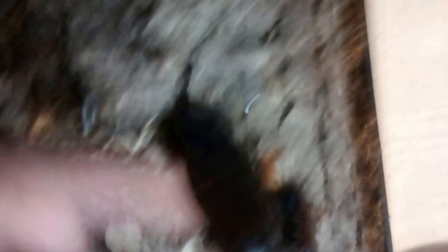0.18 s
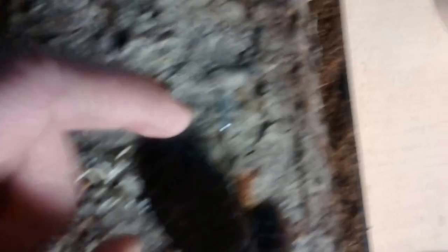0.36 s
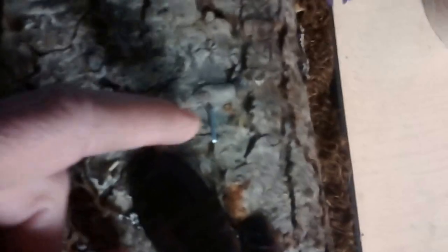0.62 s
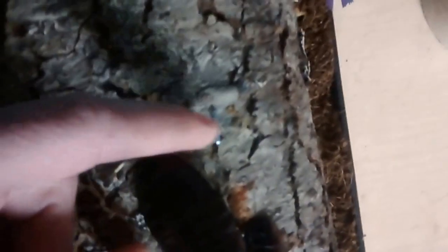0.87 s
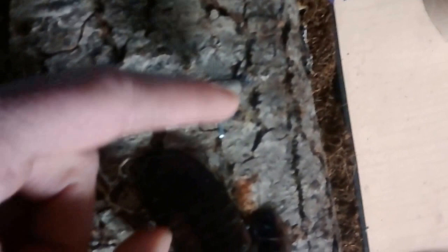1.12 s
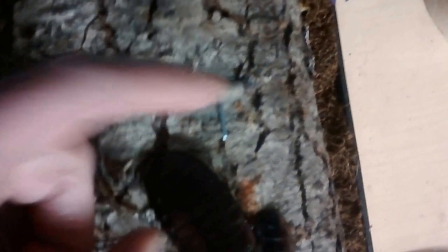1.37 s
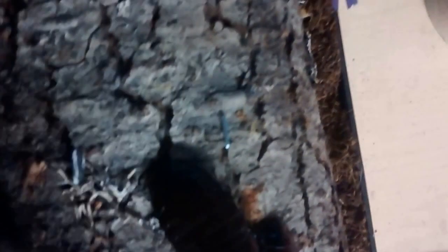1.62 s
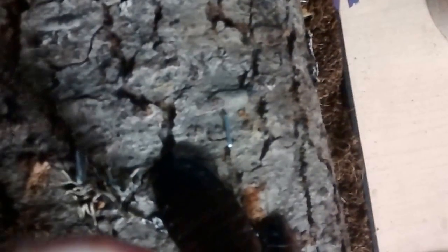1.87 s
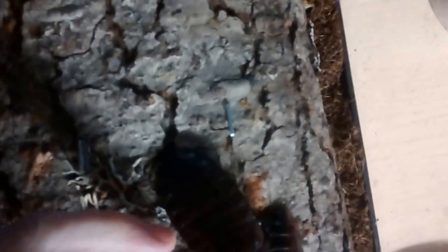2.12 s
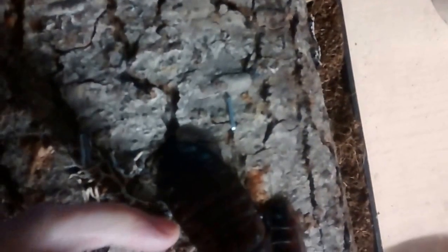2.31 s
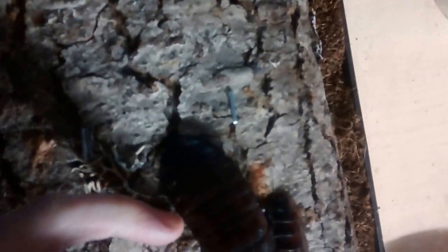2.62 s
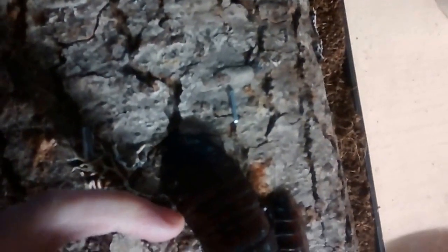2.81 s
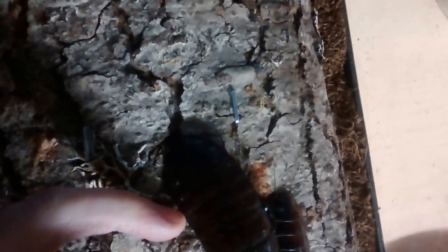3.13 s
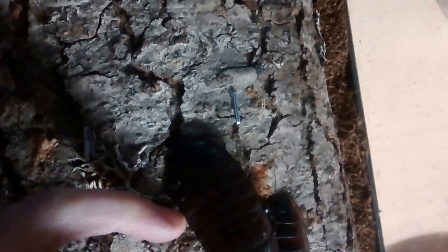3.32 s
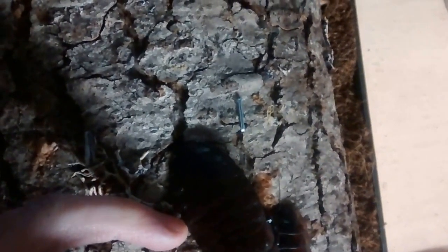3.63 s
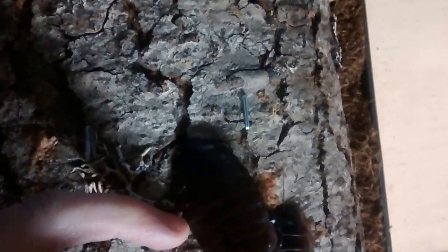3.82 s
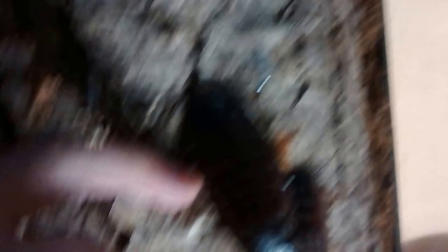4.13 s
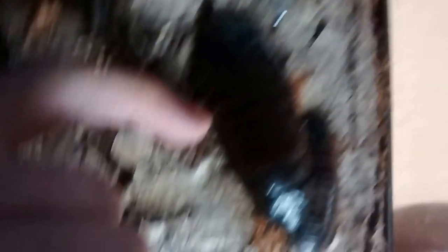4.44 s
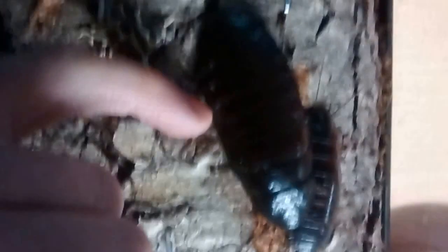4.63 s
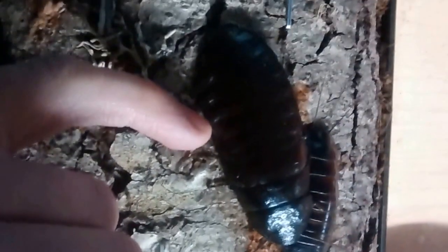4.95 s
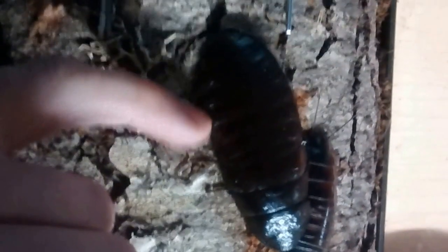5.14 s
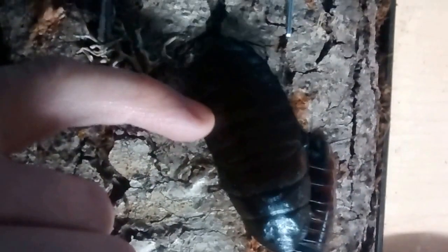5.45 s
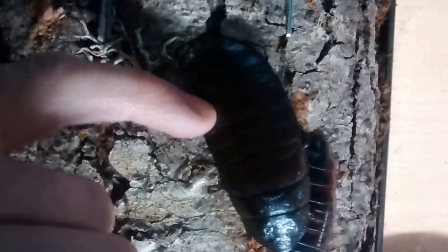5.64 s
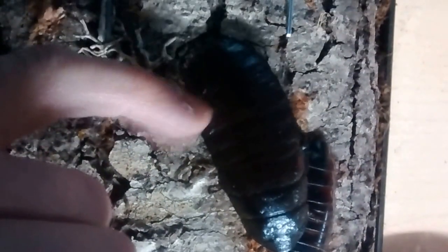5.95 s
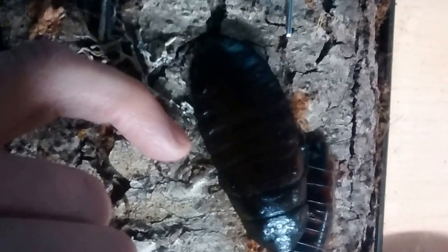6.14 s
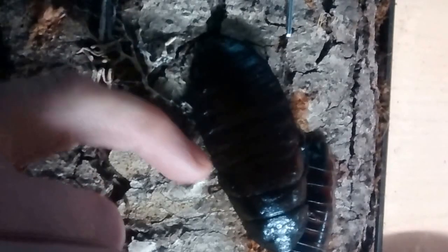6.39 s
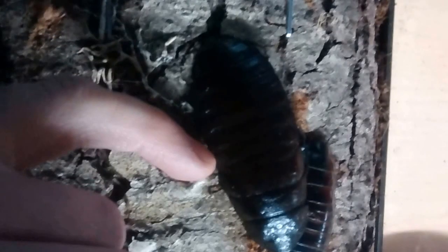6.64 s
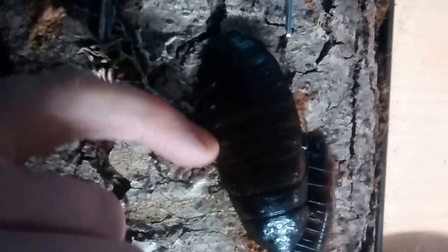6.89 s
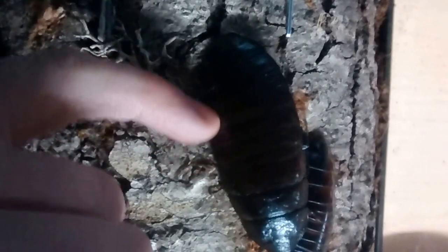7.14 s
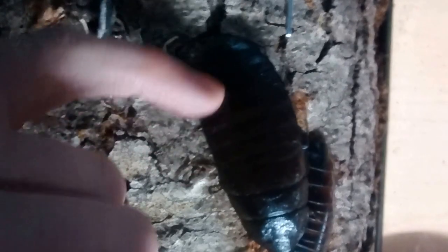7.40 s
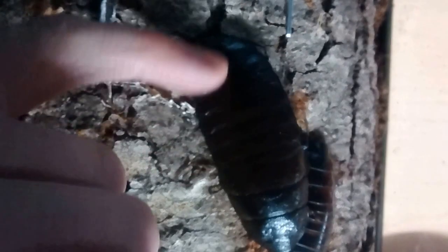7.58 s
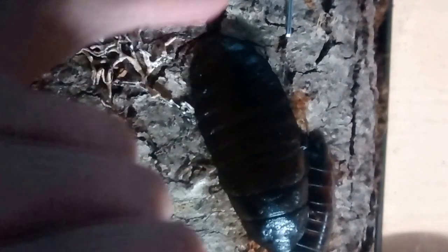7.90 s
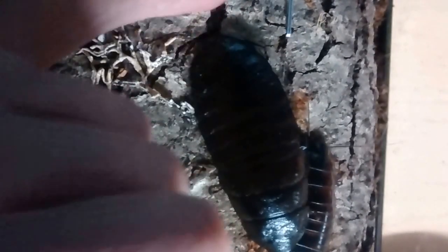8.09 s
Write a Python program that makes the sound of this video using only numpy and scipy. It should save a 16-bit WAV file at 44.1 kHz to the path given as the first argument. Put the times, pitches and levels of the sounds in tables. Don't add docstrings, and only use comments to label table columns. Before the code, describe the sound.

Close up in a small glass tank indoors, a large cockroach hisses four times, each a rush of bright, breathy air a little over half a second long, opening fast and shutting off abruptly. The third is strongest. Between them lie a low motor hum, air rumble and faint microphone hiss. Soft low thuds cluster around the middle, with a dry tick on bark. Handheld wide stereo microphone.

```python
import sys
import numpy as np
from scipy import signal
from scipy.fft import rfft, irfft, next_fast_len
from scipy.io import wavfile
from scipy.ndimage import map_coordinates

SR = 44100
rng = np.random.default_rng(int(sys.argv[2]) if len(sys.argv) > 2 else 0)


def unload_wav(signal):
    wavfile.write(
        sys.argv[1],
        SR,
        np.round(np.clip(np.atleast_2d(signal).T, -1, 1) * 32767).astype(np.int16),
    )


def voltage_ratio(level):
    return 10 ** (np.asarray(level, float) / 20)


N = 364266


def unit(x):
    return x / np.sqrt(np.mean(x ** 2) + 1e-20)


def along(points, hz):
    f, v = np.transpose(points)
    return np.interp(np.log(hz + 1), np.log(f + 1), v)


def curves(rows, t):
    s, *columns = np.transpose(rows)
    return [np.interp(t, s, column) for column in columns]


def wobble(rate, size):
    knots = rng.standard_normal(int(size * rate / SR) + 4)
    return map_coordinates(knots, [np.arange(size) * rate / SR])


def filtered(x, response):
    m = next_fast_len(x.shape[-1] + 8192)
    spectrum = rfft(x, m) * response(np.fft.rfftfreq(m, 1 / SR))
    return irfft(spectrum, m)[..., :x.shape[-1]]


def add(total, x, s):
    part = total[:, round(s * SR):][:, :x.shape[-1]]
    part += x[..., :part.shape[1]]


def room():
    # (frequency [Hz], density [dB per Hz])
    rumble = [(15, -40), (28, -8), (45, -2), (65, -7.5), (90, -10.5), (129, -2), (165, -11.5), (206, -15.5),
              (260, -12), (330, -11.5), (450, -14), (1100, -31), (2400, -120)]
    # (frequency [Hz], likeness [-1 to 1])
    alike = [(30, 0.65), (130, 0.31), (400, 0.19), (1000, 0.21)]
    # (time [s], level [dB])
    drift = [(0, -59.5), (.9, -62.5), (1.86, -60), (2.4, -65), (3.1, -61), (3.9, -62.5), (4.21, -60.5),
             (5.02, -64), (5.71, -60.5), (6.8, -64.5), (8.26, -61.5)]

    def mid_side(hz):
        angle = np.arccos(np.clip(along(alike, hz), -1, 1)) / 2
        return voltage_ratio(along(rumble, hz)) * [np.cos(angle), np.sin(angle)]

    mid, side = filtered(rng.standard_normal((2, N)), mid_side)
    pair = np.array([mid + side, mid - side])
    scale = np.std(filtered(pair, lambda hz: (hz > 200) * (hz < 1000)))
    level_db, = curves(drift, np.arange(N) / SR)
    return voltage_ratio(level_db + 2.5 + 1.5 * wobble(5, N)) * pair / scale


def motor():
    # (time [s], third order level [dB])
    third_order = [(0, -59.5), (.9, -64.5), (1.17, -60), (1.47, -80), (1.82, -63), (2.3, -59), (2.67, -75),
                   (2.83, -61.5), (3.7, -59.5), (3.95, -71.5), (4.14, -56.5), (4.3, -68), (4.81, -62),
                   (6.42, -49.5), (7.0, -59.5), (7.43, -60), (7.62, -51.5), (8.26, -67)]
    # (frequency [Hz], level [dB])
    faint = [(258.4, -74), (325, -70), (1233, -75)]
    shaft_hz = 43.12
    t = np.arange(N) / SR
    turn = 2 * np.pi * shaft_hz * t + 0.12 * wobble(2.98, N)
    third_db, = curves(third_order, t)
    fourth_db = -70 + 0.48 * (third_db - third_db.mean()) + 3.1 * wobble(4, N)
    out = voltage_ratio(-49.5 + 0.55 * wobble(1.85, N)) * np.sin(turn) * voltage_ratio([[.5], [-.5]])
    third = voltage_ratio(third_db + 5.0 + 0.77 * wobble(12, N)) * np.sin(3 * turn + .5 * wobble(9, N))
    out += third * voltage_ratio([[.6], [-.6]])
    out += voltage_ratio(fourth_db + 4.5 + 1.7 * wobble(12, N)) * np.sin(4 * turn + 1.2 * wobble(12, N))
    for hz, db in faint:
        phase = 2 * np.pi * hz * t + 1.96 * wobble(25, N)
        out += voltage_ratio(db + 2.0 + 2.4 * wobble(15, N)) * np.sin(phase)
    return out


def ticks():
    # (time [s], level [dB], centre frequency [Hz], 60 dB decay time [s])
    clicks = [
        (0.0005, -42.5, 4020, 0.032),
        (4.2238, -42.5, 2350, 0.032),
        (4.594, -72, 3000, .02),
        (4.881, -69, 3000, .02),
        (5.253, -60, 4500, .015),
    ]
    out, t = np.zeros((2, N)), np.arange(SR // 20) / SR
    for s, db, hz, t60 in clicks:
        noise = rng.standard_normal(len(t))
        click = unit(filtered(noise, lambda f: 1 / (1 + (np.log2(f / hz + 1e-3) / .95) ** 4)))
        onset = 1 - np.exp(-t / 0.00066)
        add(out, voltage_ratio(db - 60 * t / t60) * click * onset * np.ones((2, 1)), s)
    return out


def squeeze(start, length, full_db, swell, sag_db):
    shut_db, dull = -93, -4.5
    end = start + length
    closing = end - .037
    sagging = end - .037 - .052
    return [(start, shut_db, dull),
            (start + .011, -42, dull),
            (start + 0.036 + 0.085 * swell, -36, 0),
            (min(start + swell, sagging - .001), full_db, 0),
            (sagging, full_db, 0),
            (closing, full_db - sag_db, dull),
            (end, shut_db, -25)]


def colour_db(hz, spectrum, waves):
    modes = sum(1.3 * db / (1 + (2 * (hz - centre) / width) ** 2) for centre, width, db in waves)
    return along(spectrum, hz) + modes


def hiss(rows, colours, lead):
    # (frequency [Hz], level [dB])
    tank = [(1000, -12), (1850, -28), (2400, -28), (3100, -20), (4000, -7), (10000, -6), (12500, -11.5),
            (15000, -8)]
    # (time [s], half width [s], depth [dB])
    catch = (1.009, .006, 13)
    catch_s, half_width_s, depth_db = catch
    t = np.arange(rows[0][0], rows[-1][0] + .05, 1 / SR)
    level_db, bright_db = curves(rows, t)
    level_db = level_db - depth_db * np.exp(-((t - catch_s) / half_width_s) ** 2)
    flutter_db = 0.59 * wobble(13.4, len(t)) + 0.21 * wobble(158.8, len(t)) + 0.39 * wobble(900, len(t))
    air = rng.standard_normal((2, len(t)))
    octaves = filtered(air, lambda hz: np.clip(np.log2(hz / 6000 + 1e-3), -1.5, 1.5))
    tilt = np.clip(.115 * bright_db, -.62, .3)
    near, far = voltage_ratio(level_db + flutter_db) * (t < rows[-1][0]) * (air + tilt * octaves)

    age = np.arange(SR // 20) / SR
    glass = rng.standard_normal((2, 2, len(age))) * voltage_ratio(-60 * age / .025) * (age > .0006)
    glass /= np.linalg.norm(glass, axis=2, keepdims=True)

    def colour(hz):
        sides_db = np.array([colour_db(hz, *c) for c in colours])
        even = (hz > 1930) * (hz < 2500)
        gain = voltage_ratio(np.where(even, sides_db.mean(axis=0), sides_db))
        gain = gain * (hz > 1140) / (1 + (hz / 15250) ** 100)
        return gain / np.sqrt(np.mean(gain ** 2) * (1 + voltage_ratio(2 * along(tank, hz))))

    def direct(hz):
        return np.exp(.5j * along(lead, hz) * [[1], [-1]])

    def echoes(hz, vent):
        response = rfft(glass[vent], SR)[:, np.round(hz).astype(int)]
        return voltage_ratio(along(tank, hz) - [1.5, 6][vent]) * response

    near_sides = filtered(near, lambda hz: colour(hz) * (direct(hz) + echoes(hz, 0)))
    far_sides = filtered(far, lambda hz: colour(hz) * echoes(hz, 1))
    return voltage_ratio(4.0) * (near_sides + far_sides)


def swayed(pair):
    sway_s, sways_per_s = 5e-6, 15
    slope = filtered(pair, lambda hz: 1j * np.pi * hz)
    lag = sway_s * wobble(sways_per_s, pair.shape[1]) * np.array([[1], [-1]])
    return pair + lag * slope


def cockroach():
    # (start [s], length [s], full air level [dB], swell [s], sag as the body empties [dB])
    hisses = [
        (0.976, 0.6486, -34, .2, 3.5),
        (2.627, 0.62, -32.5, 0.13, 6.5),
        (5.288, 0.618, -30.5, 0.25, 3.5),
        (7.136, 0.688, -33.5, 0.66, 7.5),
    ]
    # (frequency [Hz], density [dB per Hz])
    left = [
        [(1120, -29.2), (4740, -12.6), (4910, -6.4), (5600, -16.0), (7060, -6.7), (7410, -12.4), (7840, -3.8),
         (8530, -2.0), (9390, -15.2), (9730, -9.3), (11110, -20.6), (15250, -27.2)],
        [(1120, -30.5), (4740, -12.2), (4910, -7.4), (5680, -17.1), (6120, -10.8), (6890, -8.3), (7580, -12.5),
         (8010, 0.3), (8960, -8.1), (9820, -6.3), (11020, -19.5), (15250, -25.1)],
        [(1120, -26.7), (1550, -29.3), (2330, -16.9), (2760, -21.0), (3530, -11.5), (5080, -13.6), (5600, -5.1),
         (6290, -18.0), (6800, -6.7), (8870, -4.8), (13260, -21.7), (15250, -21.2)],
        [(1120, -27.9), (1550, -30.2), (2410, -17.4), (2670, -23.3), (3620, -12.9), (4050, -19.1), (5680, -7.6),
         (6290, -15.9), (6720, -9.1), (8790, -5.4), (13440, -30.4), (15250, -25.5)],
    ]
    right = [
        [(1120, -25.0), (3450, -15.9), (3880, -9.0), (4480, -11.2), (5000, -0.3), (5680, -14.1), (6800, -14.9),
         (7490, -7.3), (8010, -12.7), (8530, -5.5), (9990, -21.6), (15250, -27.5)],
        [(1120, -27.7), (1810, -20.2), (3270, -18.2), (5170, -2.8), (5680, -14.8), (6030, -10.0), (6460, -16.0),
         (8610, -6.0), (9910, -18.9), (14210, -26.8), (14730, -20.9), (15250, -28.7)],
        [(1120, -26.2), (1550, -22.8), (1720, -16.2), (2840, -19.9), (4820, -0.9), (5510, -4.8), (6030, -18.2),
         (8700, -7.1), (10250, -17.5), (11280, -13.2), (14040, -28.0), (15250, -19.9)],
        [(1120, -28.4), (1550, -26.0), (1720, -19.1), (2930, -19.1), (4480, -7.3), (4910, -1.1), (6290, -19.9),
         (8790, -7.2), (9470, -20.2), (11630, -21.0), (12060, -28.0), (15250, -29.2)],
    ]
    # (frequency [Hz], width [Hz], level [dB])
    waves_left = [
        [(1640, 200, -3.8), (2500, 200, 4.3), (3270, 200, -2.9), (3960, 120, 2.9), (4310, 120, 3.4),
         (4650, 120, -4.3), (12400, 200, 4.0)],
        [(1640, 200, -3.8), (2410, 350, 3.1), (3360, 350, -3.1), (4310, 200, 3.2), (5250, 120, -3.7),
         (13440, 200, -9.2), (14640, 350, 4.9)],
        [(4220, 120, -3.2), (7320, 120, -3.4), (7920, 200, 2.8), (8440, 120, -4.0), (9220, 120, -3.3),
         (11630, 200, 6.3), (13090, 200, -5.8)],
        [(4910, 120, 2.7), (5080, 120, -4.0), (6980, 200, 3.2), (7320, 120, -3.8), (8180, 200, -3.0),
         (8700, 350, 2.3), (12060, 200, -7.7)],
    ]
    waves_right = [
        [(1120, 120, -2.4), (1720, 120, 2.3), (2500, 120, 2.6), (6290, 120, 3.3), (6550, 120, -3.5),
         (9390, 120, -4.4), (9650, 120, 4.3)],
        [(3450, 200, -2.8), (3880, 200, 3.5), (4650, 120, -4.2), (5000, 120, 4.1), (12490, 350, 4.6),
         (13440, 120, -6.5), (14130, 200, -6.7)],
        [(1810, 120, 2.8), (2070, 120, -3.1), (3700, 200, 2.1), (6370, 200, -3.1), (6800, 200, 2.9),
         (7920, 120, -4.2), (9390, 120, -4.4)],
        [(5170, 120, -3.1), (5600, 200, 3.2), (5860, 120, -3.8), (7920, 120, -5.2), (10340, 200, -6.1),
         (12660, 200, 5.7), (13520, 120, -8.8)],
    ]
    # (frequency [Hz], lead of the left side [rad])
    leads = [
        [(1460, -.2), (1810, -3.1), (2750, -3.15), (3300, -5.6), (5170, -9.1), (5860, -4.9), (6980, -6.6),
         (8270, -11.8), (9650, -13.1), (10940, -7.6), (12140, -15.8), (13700, -15.6), (14100, -12.6),
         (15250, -12)],
        [(1460, -.2), (1720, -3.1), (2930, -3.13), (3100, 0), (4050, .1), (6120, 7), (6980, 5), (7840, 8.8),
         (8530, 6.6), (9220, 7.8), (10590, 17), (12300, 9.3), (13400, 9.8), (14100, 12.5)],
        [(1550, .2), (1810, 3.14), (2480, 3.14), (2700, 2.45), (2900, 3.14), (3250, 3.19), (4740, 11),
         (5600, 7), (7840, 10.4), (8790, 6.8), (10420, 9.9), (11500, 5.4), (12600, 9), (13800, 10),
         (14500, 12.6)],
        [(1550, .2), (1810, 3.16), (2480, 3.14), (2700, 2.1), (2900, 3.14), (3300, 3.15), (4520, 11),
         (6550, .9), (7920, 3.9), (8530, .9), (11020, 3.3), (12400, 9), (13900, 10.2), (14300, 12.6)],
    ]
    out = np.zeros((2, N))
    left_colours, right_colours = zip(left, waves_left), zip(right, waves_right)
    for row, lead, *sides in zip(hisses, leads, left_colours, right_colours):
        add(out, swayed(hiss(squeeze(*row), sides, lead)), row[0])
    return out


def thuds():
    # (time [s], peak level [dB], frequency [Hz], 60 dB decay time [s])
    blows = [
        (3.486, -43.5, 31.7, 0.22),
        (3.619, -45, 30.2, 0.21),
        (4.053, -38, 37, 0.19),
        (4.179, -41.5, 33, 0.14),
        (4.479, -42, 156.5, 0.12),
        (4.619, -37.5, 37.3, 0.21),
        (4.749, -42, 42.8, 0.15),
        (5.138, -46.5, 33, 0.28),
        (5.618, -36.5, 38, 0.18),
        (6.129, -46, 40, 0.15),
    ]
    out, t = np.zeros((2, N)), np.arange(SR // 2) / SR
    for s, db, hz, t60 in blows:
        shape = voltage_ratio(-60 * t / t60) * (1 - np.exp(-t / 0.029)) ** 2
        noise = rng.standard_normal((2, len(t)))
        puff = unit(filtered(noise, lambda f: f / 90 / (1 + (f / 150) ** 5)))
        swing = np.sin(2 * np.pi * hz * t) * voltage_ratio([[.5], [-.5]])
        add(out, voltage_ratio(db + 21.5) * shape * (swing + voltage_ratio(-15) * puff), s - .008)
    return out


def widened(ports):
    # (frequency [Hz], density [dB per Hz])
    self_left = [(300, -4.5), (900, -6.5), (1500, -6.5), (3700, -7), (4300, -7), (9000, -10), (15300, -11)]
    self_right = [(300, -2), (900, -1), (1500, -1), (3400, -3), (4100, -4), (6300, -8.5), (15300, -11.5)]
    # (frequency [Hz], level [dB])
    into_left = [(100, -8.5), (2500, -5.5), (5000, -16.5), (15000, -7)]
    into_right = [(100, -7), (2500, -7), (5000, -8), (9000, -36)]
    cross_lag = [
        [17.3],
        [18],
    ]

    def own(hz):
        return voltage_ratio([along(self_left, hz), along(self_right, hz)]) * (hz > 300)

    def cross(hz):
        gain = voltage_ratio([along(into_left, hz), along(into_right, hz)])
        return gain * np.exp(-2j * np.pi * hz * np.array(cross_lag) / SR)

    ports = ports + voltage_ratio(-58.5) * unit(filtered(rng.standard_normal((2, N)), own))
    return ports - filtered(ports[::-1], cross)


def scene():
    return cockroach() + widened(room() + motor() + ticks() + thuds())


def low_pass(x):
    return signal.sosfilt(signal.butter(12, 16170, fs=SR, output="sos"), x)


def record(dry):
    mix = filtered(dry, lambda hz: (hz < 15540) * (hz > 15))
    return low_pass(mix)


dry = scene()
out = record(dry)
unload_wav(out)
```